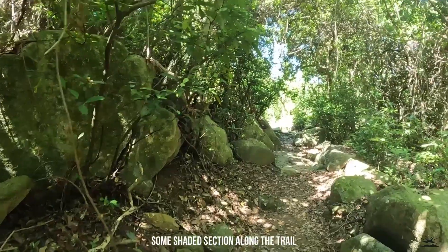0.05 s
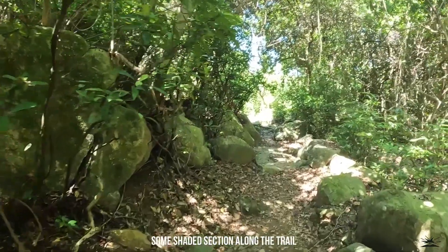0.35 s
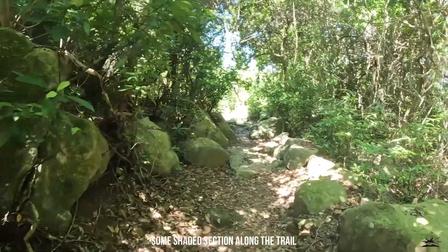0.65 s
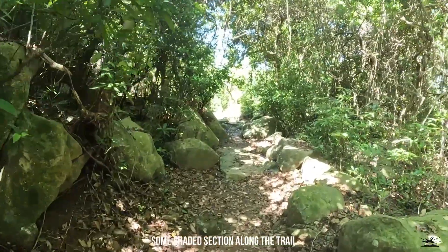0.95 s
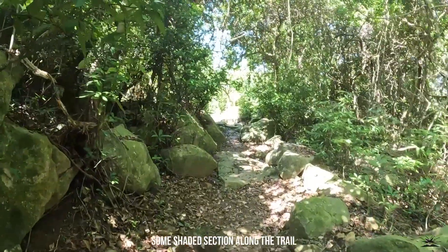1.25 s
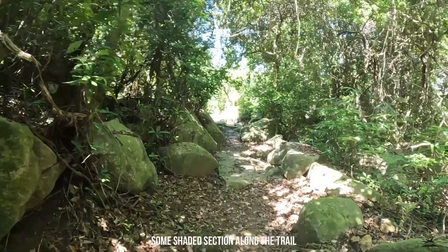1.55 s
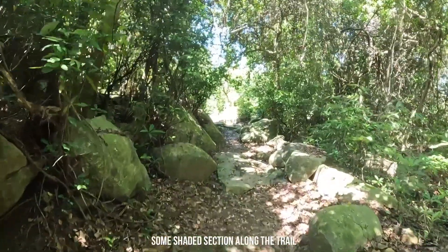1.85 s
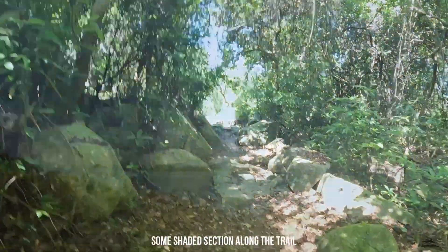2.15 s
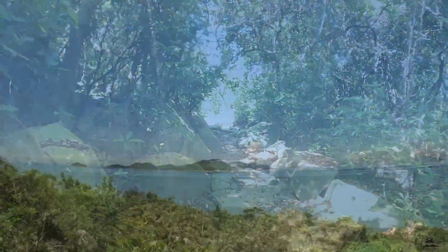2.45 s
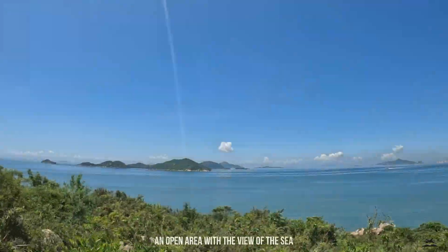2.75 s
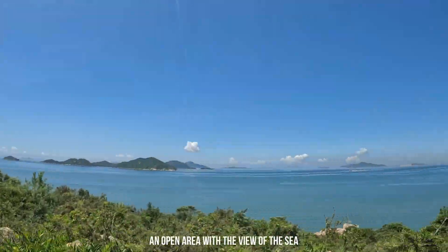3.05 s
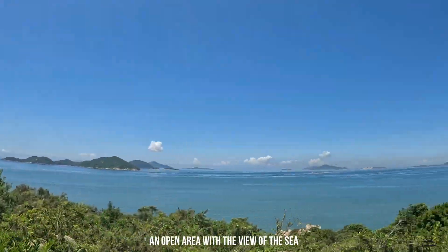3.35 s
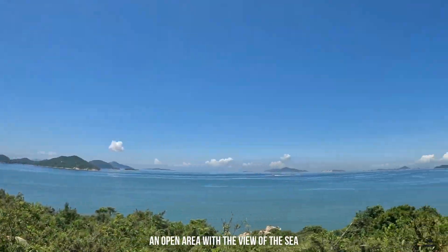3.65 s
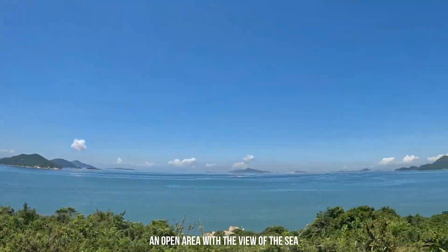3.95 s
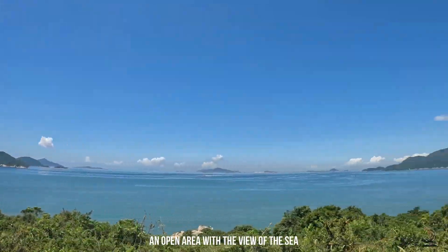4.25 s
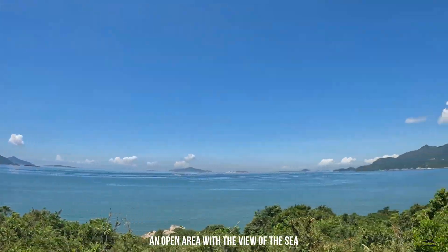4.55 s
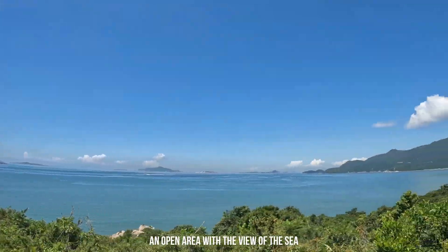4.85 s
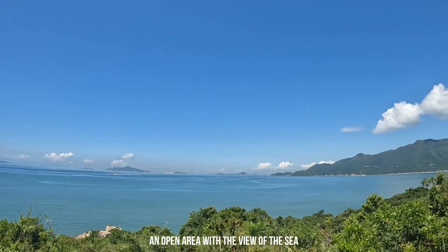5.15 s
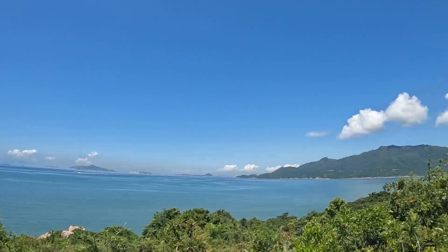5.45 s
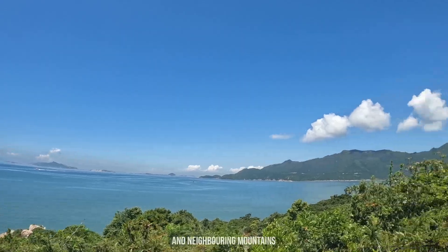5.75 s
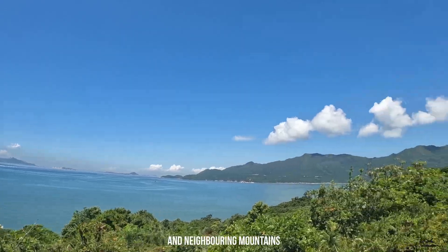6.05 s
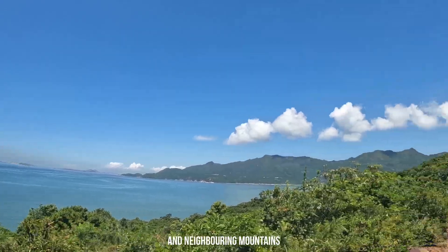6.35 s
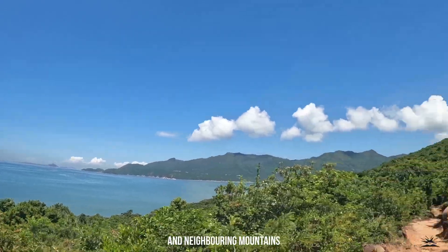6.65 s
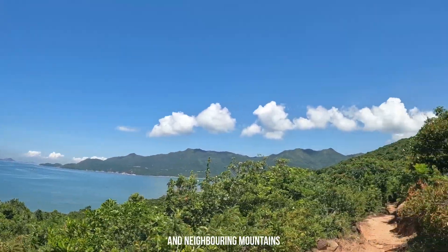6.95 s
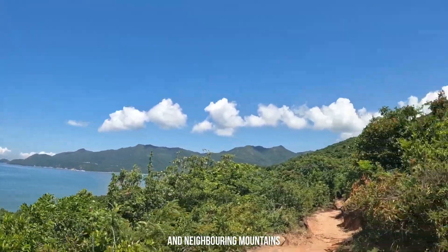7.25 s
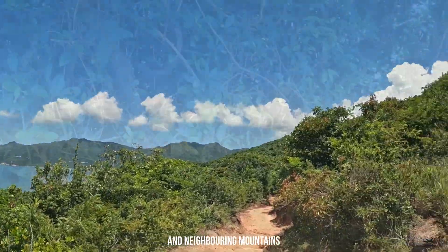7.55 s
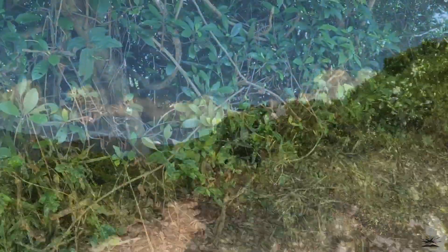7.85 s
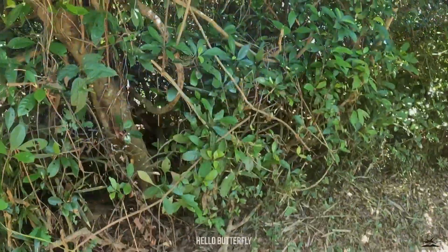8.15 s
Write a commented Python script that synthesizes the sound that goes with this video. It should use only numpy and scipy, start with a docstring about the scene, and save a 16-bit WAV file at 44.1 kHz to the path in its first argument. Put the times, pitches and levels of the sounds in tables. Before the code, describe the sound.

Someone walks a stony trail, crunching leaves and tipping pebbles, while birds whistle over wind rumble and a faint distant sea.

```python
"""A trail walk. Throughout, heels knock on rock, soles grind grit and dry leaves, air rumbles on the camera.
It starts in a hissing wood with far birds; a small object jingles and grit rasps. Near 3 s the trail
opens on a slope above the rushing sea and the image falls to mono. Tipped pebbles clack, faint insects
shrill, a near bird whistles a phrase. The image widens; by 7 s the wood is back, the bird sings again,
and a leg sweeps through dry grass as leaves snap."""
import sys
import numpy as np
from scipy import signal
from scipy.fft import rfft, irfft, next_fast_len
from scipy.io import wavfile
from scipy.ndimage import map_coordinates

SR = 44100
rng = np.random.default_rng(int(sys.argv[2]) if len(sys.argv) > 2 else 0)


def wav_record(signal):
    """Record a signal, one row per channel, as 16-bit PCM in the file named by sys.argv[1]."""
    frames = np.transpose(np.atleast_2d(signal))
    bounded = np.clip(frames, -1, 1)
    # unit amplitude maps onto the largest positive 16-bit level
    quanta = np.round(bounded * 32767).astype(np.int16)
    wavfile.write(sys.argv[1], SR, quanta)


N = 370440  # 8.4 s

# Levels are ahead of the mix gains.
# Spectral shapes: f/Hz, relative density/dB
BUFFET_SPECTRUM = [(8, -11.5), (18, 16), (32, -5), (50, -4), (80, -19.5), (200, -67), (500, -100)]
RUMBLE_SPECTRUM = [(30, -17), (55, -3.5), (74, -1), (100, -9), (122, -15.5), (140, -10), (175, -24),
                   (300, -39), (900, -94)]
WOOD_SPECTRUM = [(200, 14.5), (750, -4), (1100, 1.5), (1700, 4), (2700, -3.5), (5000, -5), (7400, -10),
                 (8600, -18.5), (13000, -21), (14500, -42)]
SEA_SPECTRUM = [(80, -15), (170, 3.5), (290, 1), (430, -6.5), (700, -18), (1500, -23), (2600, -39),
                (6000, -79)]
GRASS_SPECTRUM = [(3000, -12), (4500, -6), (7200, 2), (8600, -10.5), (13000, -8), (14200, -8),
                  (15800, -23.5)]
GRIT_SPECTRUM = [(200, -9.5), (1700, 4.5), (3000, -0.5), (7500, -1), (13000, -17.5), (15800, -37.5)]
GRAVEL_SPECTRUM = [(120, -31.5), (300, 0), (500, 5), (750, 0), (1150, 4.5), (2050, 0.5), (2700, -9.5),
                   (4200, -26.5), (9000, -51)]
LEAF_SPECTRUM = [(900, -0.5), (2200, 6), (3800, 5.5), (5500, 2.5), (7300, -0.5), (8600, -8.5),
                 (13000, -14.5), (14200, -18.5), (15800, -40.5)]
# Envelopes: t/s, level/dB
BUFFET_LEVEL = [(0.0, -38.5), (0.56, -35.5), (0.7, -44.5), (1.45, -46), (2.36, -29.5), (2.95, -47),
                (4.3, -46), (6, -52.5), (7.27, -46.5), (8.02, -37), (8.4, -43.5)]
RUMBLE_LEVEL = [(0.0, -48.5), (0.4, -50), (0.51, -51), (1.35, -56), (2.08, -47.5), (2.24, -41.5),
                (3.04, -50), (3.48, -46.5), (4.35, -43.5), (7.25, -43), (8.05, -41.5), (8.4, -53.5)]
GRASS_LEVEL = [(7.729, -52), (7.78, -47.5), (7.911, -41), (8.0, -62)]
# Surroundings: t/s, wood hiss/dB, sea/dB
AMBIENT_LEVELS = [(0, -54, -60.5), (.55, -54, -60.5), (1.15, -56, -70.5), (1.55, -59, -66),
                  (1.95, -55, -58), (2.4, -55, -53), (2.76, -56, -50), (2.82, -64, -51), (3.1, -80, -48),
                  (4.4, -70.5, -54.5), (6.4, -75.5, -55.5), (7.15, -64.5, -60), (7.3, -70.5, -59),
                  (7.55, -59.5, -60.5), (8.1, -64, -56.5), (8.3, -63, -66)]
# Echo among trees: f/Hz, t60/s
TREE_DECAY = [(300, 0.3), (3000, 0.3), (10000, 0.5)]
# Insect calls: t/s, length/s, level/dB, f/Hz
INSECT_CALLS = [(3.151, 1.8, -91.5, 7700)]
# Far bird notes: t/s, length/s, level/dB, swell/dB, first f/Hz, middle f/Hz, last f/Hz
FAR_NOTES = [(0.551, 0.075, -56, -3, 2720, 2890, 3910), (0.623, 0.047, -52, -2, 3850, 2720, 2430),
             (1.254, 0.028, -50, 5, 3680, 2700, 2330), (3.492, 0.03, -68.5, 8, 3600, 3500, 3330),
             (5.432, 0.031, -58.5, 6, 3260, 3570, 3730), (5.675, .075, -64, -3, 3180, 3450, 3170),
             (6.362, 0.081, -67.5, 8, 3200, 3470, 3880), (6.539, 0.066, -59, 5, 3810, 3300, 3010),
             (6.692, 0.032, -55.5, -9, 2670, 2580, 2670), (7.57, 0.04, -64, -7, 3400, 3520, 3500)]
# Near bird notes: as above, then trill depth/fraction of pitch, trill rate/Hz
NEAR_NOTES = [(3.547, 0.09, -35.5, 2, 2910, 3115, 3630, 0.056, 140),
              (3.887, 0.088, -34.5, -5, 2460, 2910, 3500, 0.21, 62),
              (4.061, 0.062, -33, 2.5, 2940, 3000, 2810, 0.099, 42),
              (4.28, 0.044, -36.5, 11, 2360, 2544, 2500, 0.05, 73),
              (4.335, 0.1, -36, 11.5, 2785, 2095, 1760, 0.0054, 150),
              (7.066, 0.05, -42, 11, 2474, 3120, 3740, 0.27, 83),
              (7.155, 0.058, -47, 17, 3096, 2980, 3140, 0.085, 205),
              (7.207, 0.047, -36.5, 3, 3280, 3700, 4250, 0.07, 177),
              (7.283, 0.09, -48.5, 2, 3550, 2860, 2290, .025, 290)]
# Jingles of a small object: t/s, level/dB
JINGLES = [(2.449, -52), (2.465, -42.5)]
# Rasps of grit underfoot: t/s, length/s, level/dB
GRIT_RASPS = [(.251, 0.013, -51), (2.317, 0.039, -40), (2.758, .016, -35), (2.775, 0.016, -40)]
# Soles working the ground: t/s, length/s, gravel/dB, leaves/dB
SOLE_SCUFFS = [(0.25, 0.0081, -48.5, -54.5), (0.809, 0.015, -48, -57.5), (0.923, 0.076, -72, -45.5),
               (1.641, 0.21, -54.5, -57), (2.118, 0.032, -46.5, -62.5), (2.149, 0.0092, -40.5, -48),
               (2.202, 0.067, -50.5, -51), (2.311, 0.012, -52, -45), (2.335, 0.18, -56.5, -59),
               (2.792, 0.24, -60.5, -74.5), (3.206, 0.13, -57, -70), (3.831, 0.023, -56, -88),
               (4.121, 0.01, -53, -80), (4.202, 0.21, -56, -73), (4.53, 0.17, -61.5, -79),
               (4.716, 0.0075, -49.5, -66), (4.92, 0.15, -65, -80), (5.38, 0.12, -58, -70.5),
               (5.622, 0.11, -59.5, -75), (5.724, 0.21, -52, -71), (5.908, 0.19, -58, -71.5),
               (6.178, 0.012, -54.5, -71), (6.499, 0.0042, -53, -54.5), (6.608, 0.055, -56.5, -67),
               (6.747, 0.23, -58, -66), (7.368, 0.015, -43, -54), (7.438, 0.096, -58, -63),
               (7.679, 0.011, -48, -56), (7.734, 0.25, -57, -63), (7.963, 0.24, -62.5, -69)]
# Dry leaves snapping: t/s, level/dB
LEAF_SNAPS = [(.885, -40), (1.618, -41), (1.6565, -41.5), (3.323, -50), (6.6846, -40.5), (6.8148, -39),
              (7.496, -37), (7.773, -31), (7.79, -30), (7.85, -36), (7.88, -36), (7.905, -22)]
# Loose stones tipping: t/s, level/dB, f/Hz
PEBBLE_CLACKS = [(0.836, -34, 580), (1.618, -29.5, 1760), (1.787, -21.5, 860), (2.887, -34.5, 1180),
                 (3.056, -38.5, 1103), (3.223, -33.5, 1100), (3.243, -23, 1030), (3.302, -27, 900),
                 (3.323, -30, 1000), (3.631, -37.5, 1230), (3.756, -31.5, 1650), (3.764, -33.5, 1340),
                 (3.843, -29, 1250), (4.298, -29.5, 1170), (4.402, -33, 1460), (4.721, -25.5, 1150),
                 (4.925, -30.5, 1635), (5.049, -39.5, 1150), (5.255, -37.5, 1350), (5.442, -35, 1360),
                 (5.746, -39, 1500), (5.776, -41, 1400), (5.799, -31.5, 1520), (5.866, -34, 960),
                 (5.882, -31, 1430), (5.897, -29.5, 1440), (5.958, -33.5, 1170), (6.648, -35.5, 600),
                 (6.741, -33.5, 1780), (6.815, -29.5, 1780), (6.844, -30, 2050), (6.853, -27, 2130),
                 (6.916, -19.5, 1480), (7.429, -29.5, 1160), (7.47, -27.5, 900), (7.685, -41, 940),
                 (7.736, -39.5, 734), (7.788, -32, 1720), (8.377, -40, 600)]
# Modes of a flat stone knocked at SLAB_KNOCK_HZ: f/Hz, level before roll-off/dB, t60/s
SLAB_MODES = [(1079, -13, 0.11), (1410, 0, 0.042), (1636, -3, 0.069), (1876, 11, 0.027), (2040, -6, .04),
              (2692, 1, .044), (3340, -14.5, .07)]
# Footfalls: t/s, knock/dB, knock f/Hz, settling t60/s, thud/dB, thud f/Hz, grit/dB
FOOTFALLS = [(0.271, -35.5, 2870, 0.038, -37, 197, -70), (0.291, -37, 1150, 0.011, -21, 197, -75),
             (0.441, -50, 600, 0.026, -26.5, 158, -60), (.811, -30.5, 1420, 0.058, -21, 406, -49),
             (0.9409, -10.5, 2010, 0.035, -17, 244, -25.5), (1.6609, -20, 1460, 0.029, -21.5, 265, -42.5),
             (1.736, -46, 1100, 0.06, -28.5, 212, -54), (2.1774, -15, 1236, 0.021, -11, 453, -36.5),
             (2.331, -28.5, 1920, 0.055, -31, 202, -31.5), (2.769, -39, 900, 0.062, -18, 326, -44),
             (3.243, -47.5, 980, 0.11, -24, 330, -70), (4.84, -34, 1463, 0.094, -53, 313, -66),
             (6.505, -35, 1320, 0.076, -40, 289, -50.5), (7.378, -37, 1210, 0.075, -23.5, 390, -49.5),
             (7.388, -43, 1500, 0.04, -23, 330, -67)]
# Microphone ports, left minus right: f/Hz, level/dB
PORT_BALANCE = [(60, -1), (400, 2), (1300, 6.5), (2200, 4), (4000, 0.5), (10000, 6)]
# Left port's lead: f/Hz, phase/rad
PORT_PHASE = [(60, 0.15), (700, 0.12), (2100, -0.9), (4000, -0.011), (10000, -0.13)]
# Stereo image: t/s, width/0-1
STEREO_WIDTH = [(0, 0.88), (2.805, 0.74), (2.83, 0), (4.4, 0), (5.2, 0.24), (6.1, 0.82), (7.4, 1)]

JINGLE_MODES, JINGLE_T60_S = [(8900, 1), (11400, -11.5)], 0.056  # modes: f/Hz, level/dB
THROAT_HZ, THROAT_Q = 2863, 4.2
SCOOP_S, NOTE_ATTACK_S, NOTE_RELEASE_S = 0.00612, 0.0052, 0.0024
FAR_TRILL_DEPTH, FAR_TRILL_HZ = 0.02, 122
PRESS_SHARE, RELEASE_T60_S = 0.21, 0.28
GRAVEL_FLOOR_DB, LEAF_FLOOR_DB = -71, -82  # shifting between scuffs
SLAB_KNOCK_HZ, SLAB_DB, SETTLE_DB = 1960, -11.5, 5
BAND_LIMIT_HZ = 15800


def amp(db):
    """dB to gain."""
    return 10 ** (np.asarray(db) / 20)


def unit(x):
    """x at rms 1."""
    return x / np.sqrt(np.mean(x ** 2) + 1e-20)


def along(points, hz):
    """(f/Hz, value) points read on a log axis."""
    f, values = np.transpose(points)
    return np.interp(np.log(hz + 1), np.log(f + 1), values)


def curves(rows):
    """Per-sample curve for each column after t/s."""
    times_s, *columns = np.transpose(rows)
    return [np.interp(np.arange(N) / SR, times_s, column) for column in columns]


def wobble(rate_hz):
    """Smooth random curve, knots at rate_hz."""
    knots = np.arange(N) * rate_hz / SR
    coarse = np.arange(0, knots[-1] + 1, 1 / 8)
    return np.interp(knots, coarse, map_coordinates(rng.standard_normal(int(knots[-1]) + 4), [coarse]))


def filtered(x, response):
    """x through a frequency response."""
    size = next_fast_len(N + SR // 2)
    return irfft(rfft(x, size) * response(np.fft.rfftfreq(size, 1 / SR)), size)[..., :N]


def coloured(x, spectrum):
    """x shaped by a spectrum, at rms 1."""
    return unit(filtered(x, lambda hz: amp(along(spectrum, hz))))


def spread(pair, side_db):
    """Mid and side to left and right."""
    mid, side = pair[0], amp(side_db) * pair[1]
    return np.array([mid + side, mid - side])


def add(track, start_s, sound):
    """Mix sound into track."""
    part = track[max(round(start_s * SR), 0):][:len(sound)]
    part += sound[:len(part)]


def rush(spectrum, side_db):
    """Smooth stereo noise."""
    return spread(coloured(rng.standard_normal((2, N)), spectrum), side_db)


def grains(spectrum, rate_hz, scatter_db, clump_db, side_db):
    """Tiny fractures of uneven size, in clumps."""
    place, strength, sign = rng.random((int(rate_hz * N / SR), 2, 3)).T
    size = amp(scatter_db * 3.5 * strength) * np.sign(sign - .5)
    clicks = np.array([np.bincount((p * N).astype(int), g, N) for p, g in zip(place, size)])
    return spread(coloured(clicks * amp(clump_db * wobble(90)), spectrum), side_db)


def knock(t, hz, cycles):
    """Heavily damped ring, fullest after `cycles` periods."""
    phase = np.maximum(t, 0) * hz
    rise = phase / cycles
    return (rise * np.exp(1 - rise)) ** 2 * np.sin(2 * np.pi * phase)


def clack(t, hz, cycles):
    """Blunt contact: a short wave packet centred at 1.5 ms."""
    phase = (t - .0015) * hz
    return np.exp(-(phase / cycles) ** 2) * np.sin(2 * np.pi * phase)


def settling(t, hz, t60_s, gap_s, cycles, count):
    """Fading follow-up contacts, as of a stone rocking to rest."""
    when_s = np.cumsum(gap_s * rng.uniform(.5, 1.5, count))[:, None]
    pitch_hz = hz * np.exp(rng.uniform(-.35, .35, (count, 1)))
    size = rng.choice([-1, 1], (count, 1)) * amp(-60 * when_s / t60_s)
    return np.sum(size * knock(t - when_s, pitch_hz, cycles), axis=0)


def echo(x):
    """Scattering from trunks and leaves, different at each ear."""
    hz, t, noise = signal.stft(rng.standard_normal((2, SR)), SR, nperseg=256)
    decay = amp(-60 * t / along(TREE_DECAY, hz)[:, None])
    tail = signal.istft(noise * decay, SR, nperseg=256)[1]
    tail = spread(tail / np.linalg.norm(tail[0]), side_db=-10.5)
    return signal.fftconvolve(x[None], tail, axes=1)[:, :N]


def branches(x, count=24):
    """Weak early reflections from nearby branches smear x."""
    taps = np.zeros((2, SR // 10))
    delay_s = rng.uniform(.002, .04, (2, count))
    size = rng.choice([-1, 1], (2, count)) * np.exp(-delay_s / .018)
    for ear in range(2):
        taps[ear, (delay_s[ear] * SR).astype(int)] = size[ear]
    taps = spread(taps / np.linalg.norm(taps[0]), side_db=-13)
    return signal.fftconvolve(x[None], taps, axes=1)[:, :N]


def wood_and_sea():
    """Fluttering hiss of the wood; low rush of the distant sea."""
    wood_db, sea_db = curves(AMBIENT_LEVELS)
    wood = amp(wood_db + 1.2 * wobble(29)) * rush(WOOD_SPECTRUM, side_db=-6.5)
    sea = amp(sea_db + 1.2 * wobble(5.6)) * rush(SEA_SPECTRUM, side_db=-29)
    return wood + sea


def air(buffet_gain_db=5, rumble_gain_db=5.5):
    """Air buffets and rumbles on the moving camera."""
    buffet_db = curves(BUFFET_LEVEL)[0] + buffet_gain_db
    rumble_db = curves(RUMBLE_LEVEL)[0] + rumble_gain_db
    buffet = amp(buffet_db + 0.47 * wobble(8.6)) * rush(BUFFET_SPECTRUM, side_db=-10)
    rumble = amp(rumble_db + 0.49 * wobble(9)) * rush(RUMBLE_SPECTRUM, side_db=-36)
    return buffet + rumble


def insects(width_hz=220):
    """Thin, steady shrilling from the scrub."""
    out = np.zeros(N)
    for start_s, length_s, db, pitch_hz in INSECT_CALLS:
        noise = rng.standard_normal(N)
        shrill = unit(filtered(noise, lambda hz: np.exp(-((hz - pitch_hz) / width_hz) ** 2 / 2)))
        gate = signal.windows.tukey(int(length_s * SR))
        add(out, start_s, amp(db) * gate * shrill[:len(gate)])
    return out


def whistle(notes, waver, scoop, rasp_db=2, overtone_db=-37):
    """Pitch arcs with a deepening trill that ends on an upward flick; the throat's resonance shapes them."""
    song, jitter, rasp = np.zeros(N), wobble(700), amp(rasp_db * wobble(500))
    for start_s, length_s, db, swell_db, first_hz, middle_hz, last_hz, depth, trill_hz in notes:
        t = np.arange(0, length_s, 1 / SR)
        progress, span = t / length_s, round(start_s * SR) + np.arange(len(t))
        arc_hz = np.polyval(np.polyfit([0, .5, 1], [first_hz, middle_hz, last_hz], 2), progress)
        arc_hz *= 1 - scoop * np.exp(-t / SCOOP_S)  # slide up into the note
        trill = depth * progress ** 1.3 * (np.cos(2 * np.pi * trill_hz * (length_s - t)) + .3 * jitter[span])
        pitch_hz = arc_hz * (1 + trill + waver * jitter[span])
        phase = 2 * np.pi * np.cumsum(pitch_hz) / SR
        throat = 1 / np.hypot(1, THROAT_Q * (pitch_hz / THROAT_HZ - THROAT_HZ / pitch_hz))
        edges = np.clip(np.minimum(t / NOTE_ATTACK_S, (length_s - t) / NOTE_RELEASE_S), 0, 1)
        level = np.sqrt(2) * amp(db + swell_db * (progress - .5)) * edges * rasp[span]
        overtone = amp(overtone_db) * progress * np.sin(2 * phase)
        add(song, start_s, level * (throat * np.sin(phase) + overtone))
    return song


def birds():
    """One bird close on the left; far ones heard more through the trees."""
    near = whistle(NEAR_NOTES, waver=.018, scoop=0.282)
    far = whistle([(*note, FAR_TRILL_DEPTH, FAR_TRILL_HZ) for note in FAR_NOTES], waver=.04, scoop=0)
    close = near * amp([[2.5], [-2.5]]) + .42 * branches(near) + .6 * echo(near)
    distant = .42 * far + .42 * branches(far) + .9 * echo(far)
    return amp(-7) * close + amp(2) * distant


def jingle():
    """A small hard object chatters with a step; the rattling blurs its ring."""
    out, t = np.zeros(N), np.arange(SR // 10) / SR
    onset = 1 - np.exp(-t / .003)
    for start_s, db in JINGLES:
        for hz, mode_db in JINGLE_MODES:
            blur_rad = np.cumsum(rng.normal(0, .13, len(t)))
            envelope = amp(db + mode_db - 60 * t / JINGLE_T60_S) * onset
            add(out, start_s, envelope * np.sin(2 * np.pi * hz * t + blur_rad))
    return out


def grass(fade_s=0.041):
    """A leg sweeps dry stalks: short, dense, bright crackle."""
    start_s, end_s = GRASS_LEVEL[0][0], GRASS_LEVEL[-1][0]
    t = np.arange(N) / SR
    touch = np.clip(np.minimum(t - start_s, end_s - t) / fade_s, 0, 1)
    crackle = grains(GRASS_SPECTRUM, rate_hz=3000, scatter_db=13.5, clump_db=3, side_db=-10)
    return touch * amp(curves(GRASS_LEVEL)[0] - 2.5) * crackle


def grit_rasps():
    """Short, dense rasps of grit underfoot."""
    envelope = np.zeros(N)
    for start_s, length_s, db in GRIT_RASPS:
        add(envelope, start_s, amp(db) * np.sqrt(np.abs(np.hanning(int(length_s * SR)))))
    return envelope * grains(GRIT_SPECTRUM, rate_hz=9000, scatter_db=4, clump_db=2.5, side_db=-8)


def pressure():
    """Load on gravel and leaves: in each scuff the weight builds, holds, lifts."""
    power, t = np.zeros((2, N)), np.arange(SR) / SR
    for start_s, length_s, gravel_db, leaves_db in SOLE_SCUFFS:
        build = np.sin(np.pi / 2 * np.minimum(t / (PRESS_SHARE * length_s), 1))
        lift = amp(-60 * np.maximum(t - length_s, 0) / RELEASE_T60_S)
        add(power[0], start_s, (amp(gravel_db) * build * lift) ** 2)
        add(power[1], start_s, (amp(leaves_db) * build * lift) ** 2)
    return np.sqrt(power + amp([[GRAVEL_FLOOR_DB], [LEAF_FLOOR_DB]]) ** 2)


def crunch():
    """Rolling soles grind sand, nudge small stones and crumple dry leaves."""
    on_gravel, on_leaves = pressure()
    sand = grains(GRAVEL_SPECTRUM, rate_hz=2500, scatter_db=2.5, clump_db=3, side_db=-11)
    stones = grains(GRAVEL_SPECTRUM, rate_hz=70, scatter_db=4.5, clump_db=1, side_db=-20)
    crumple = grains(LEAF_SPECTRUM, rate_hz=1900, scatter_db=2, clump_db=2, side_db=-8)
    cracks = grains(LEAF_SPECTRUM, rate_hz=70, scatter_db=3, clump_db=1, side_db=-12)
    return on_gravel * (sand + amp(-4) * stones) + on_leaves * (crumple + amp(-12.5) * cracks)


def leaf_snaps():
    """A dry leaf snaps and splinters."""
    snaps, t = np.zeros(N), np.arange(SR // 50) / SR
    for start_s, db in LEAF_SNAPS:
        splinters = amp(-9) * settling(t, 6700, t60_s=0.018, gap_s=0.00093, cycles=0.64, count=8)
        add(snaps, start_s, amp(db) * (clack(t, 6100, cycles=1) + splinters))
    return snaps


def pebbles():
    """A tipped stone clacks with a fine tick, then shifts in its bed."""
    clacks, t = np.zeros(N), np.arange(SR // 16) / SR
    for start_s, db, hz in PEBBLE_CLACKS:
        tick = amp(-24.5) * clack(t, 4700, cycles=0.58)
        shift = amp(-2) * settling(t, hz, t60_s=0.042, gap_s=0.0024, cycles=0.34, count=8)
        add(clacks, start_s, amp(db) * (clack(t, hz, cycles=0.68) + tick + shift))
    return clacks + amp(-18.5) * echo(clacks)


def slab(t, knock_hz):
    """Stone modes, phased per ear; a duller stone rings lower, with weaker high modes."""
    mode_hz, db, t60_s = np.transpose(SLAB_MODES)[:, :, None]
    rolloff = 1 / np.hypot(1, (mode_hz / knock_hz) ** 4)
    phase = rng.uniform(0, 2 * np.pi, mode_hz.shape) + rng.normal(0, 1, (2, *mode_hz.shape))
    tuning = (knock_hz / SLAB_KNOCK_HZ) ** .25
    modes = rolloff * amp(db - 60 * t / t60_s) * np.sin(2 * np.pi * tuning * mode_hz * t + phase)
    return modes.sum(axis=1) * (1 - np.exp(-t / 0.0001))


def footfalls():
    """The heel knocks and rings rock, the ground thuds under the weight, crushed grit spits."""
    blows, crush, rings = np.zeros(N), np.zeros(N), np.zeros((2, N))
    t = np.arange(SR // 10) / SR
    spit = (1 - np.exp(-(t / 0.0018) ** 2)) * amp(-60 * t / 0.082)
    for start_s, db, hz, t60_s, thud_db, thud_hz, grit_db in FOOTFALLS:
        rocking = amp(SETTLE_DB) * settling(t, hz, t60_s, gap_s=.0013, cycles=0.47, count=28)
        rock = knock(t, hz, cycles=1) + rocking
        ground = knock(t, thud_hz, cycles=0.48) + amp(-11) * knock(t, 131, cycles=0.95)
        add(blows, start_s, amp(db) * rock + amp(thud_db) * ground)
        for ear, ring in zip(rings, slab(t, hz)):
            add(ear, start_s, amp(db + SLAB_DB) * ring)
        add(crush, start_s - .004, amp(grit_db) * spit)  # grit yields before heel meets rock
    grit = crush * grains(LEAF_SPECTRUM, rate_hz=5000, scatter_db=6, clump_db=2, side_db=-6)
    return blows + rings + amp(1) * grit + amp(-11.5) * echo(blows + rings.mean(axis=0))


def scene():
    """Walker and surroundings, stereo."""
    walker = footfalls() + pebbles() + crunch() + leaf_snaps() + grit_rasps() + grass() + jingle()
    return walker + birds() + insects() + air() + wood_and_sea()


def record(dry):
    """Camera: ports differ in level and phase, the image narrows in the open, the band is limited."""
    def ports(hz):
        level_db = np.outer([.5, -.5], along(PORT_BALANCE, hz))
        phase_rad = np.outer([.5, -.5], along(PORT_PHASE, hz))
        return amp(level_db) * np.exp(1j * phase_rad)

    left, right = filtered(dry, ports)
    mid = (left + right) / 2
    side = curves(STEREO_WIDTH)[0] * (left - right) / 2
    return filtered(np.array([mid + side, mid - side]), lambda hz: hz < BAND_LIMIT_HZ)


dry = scene()
out = record(dry)
wav_record(out)
```